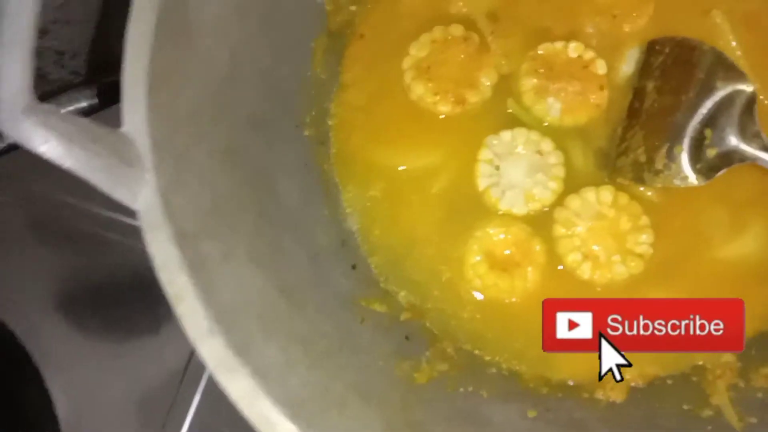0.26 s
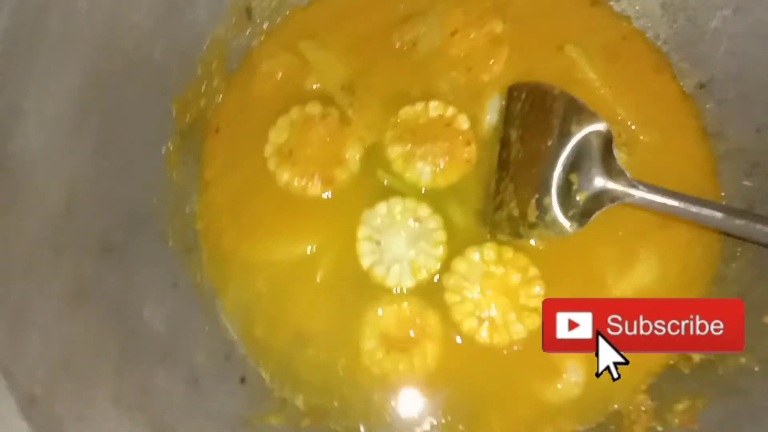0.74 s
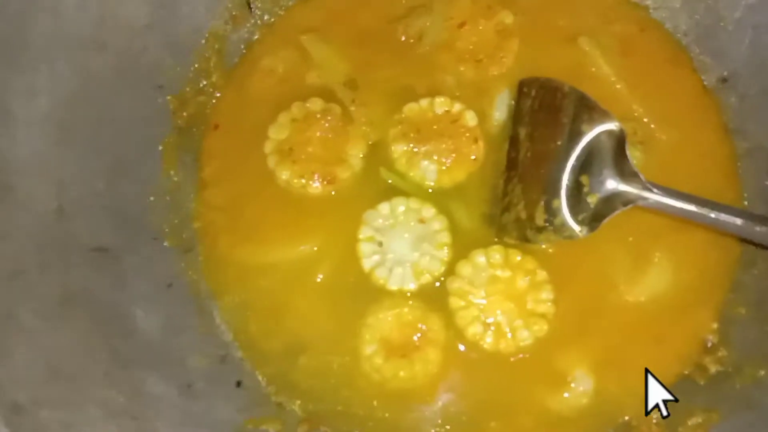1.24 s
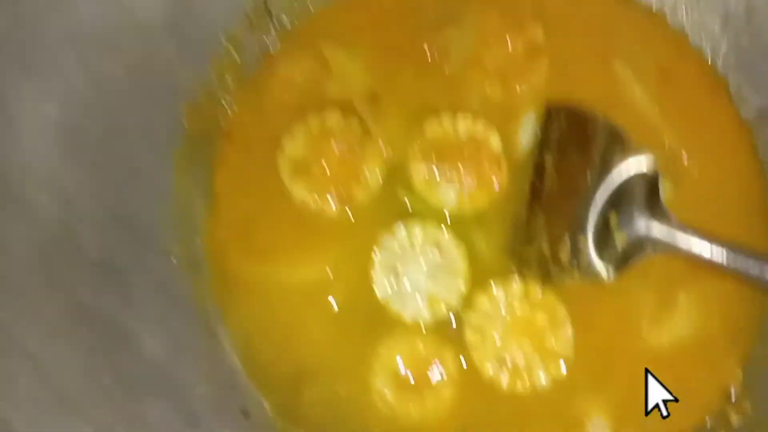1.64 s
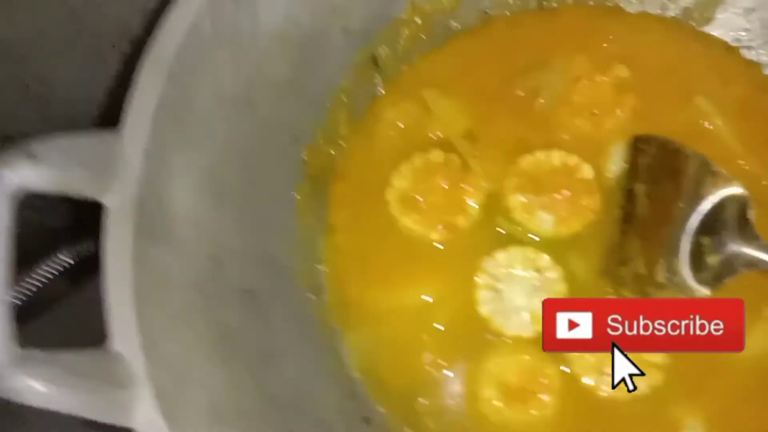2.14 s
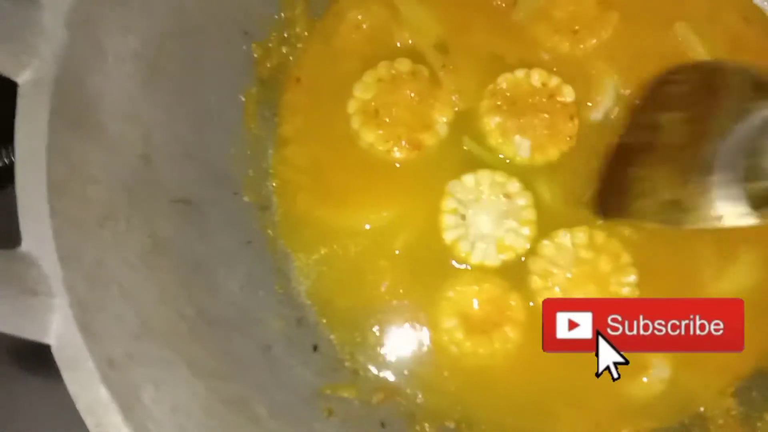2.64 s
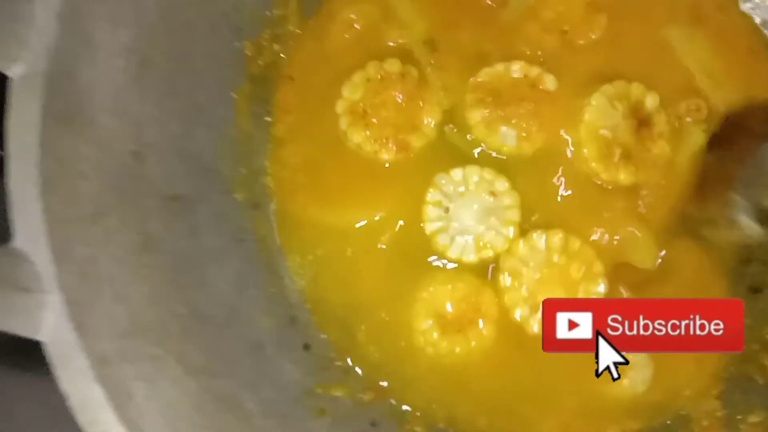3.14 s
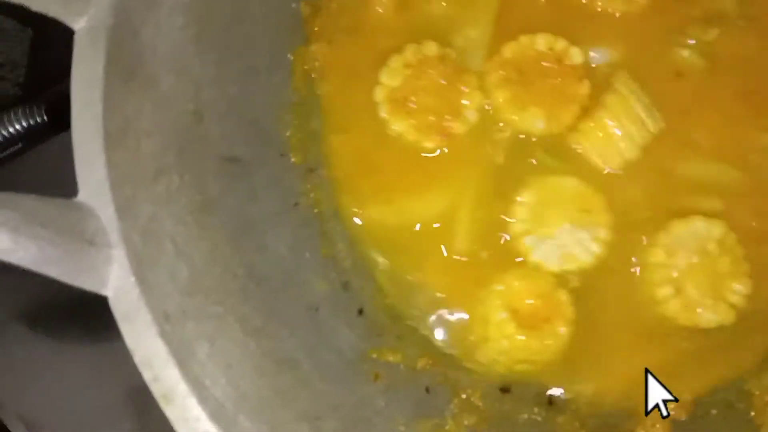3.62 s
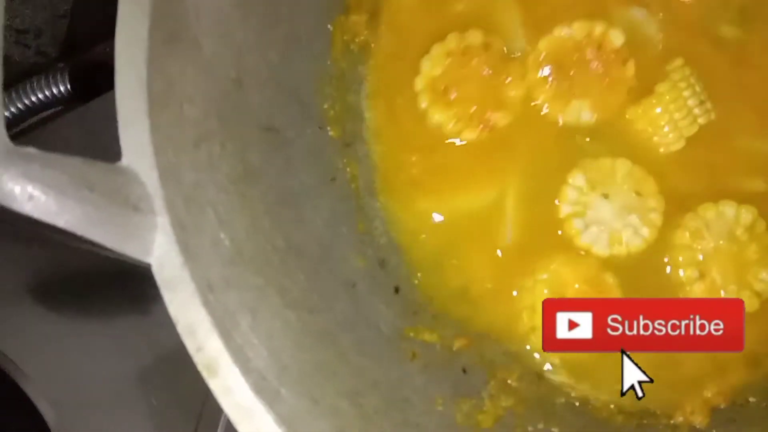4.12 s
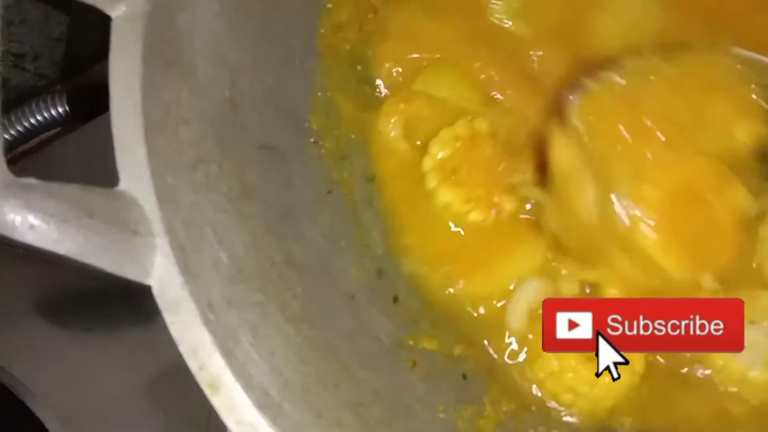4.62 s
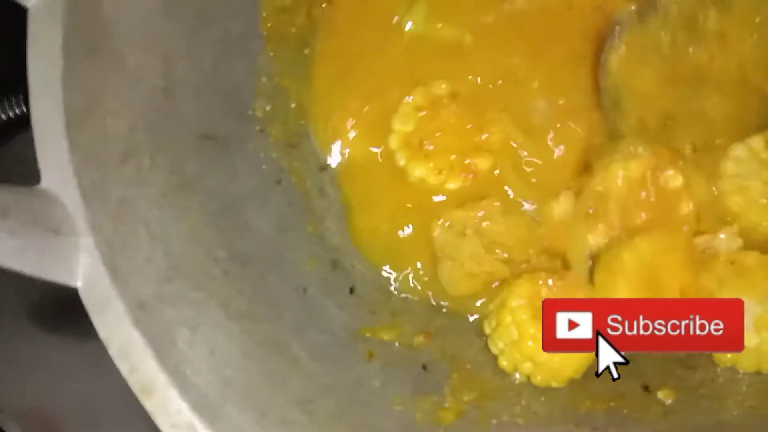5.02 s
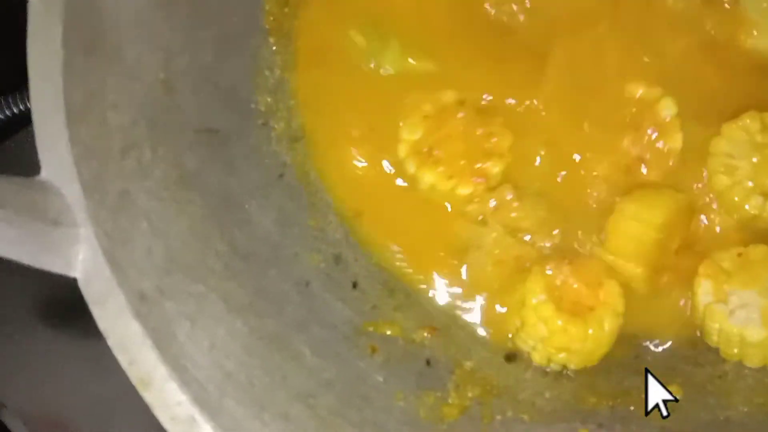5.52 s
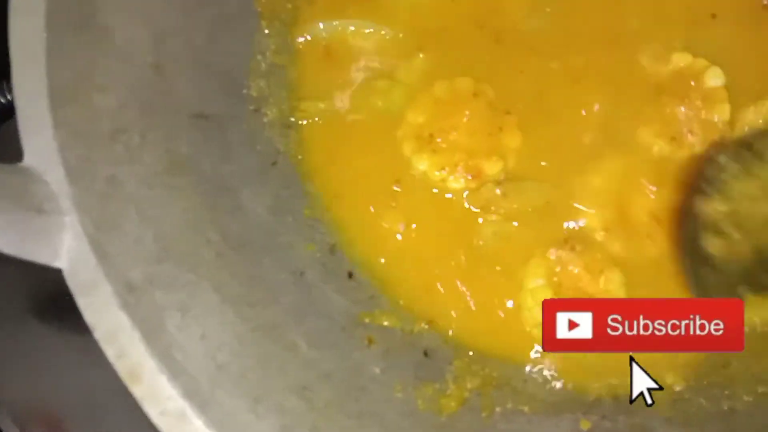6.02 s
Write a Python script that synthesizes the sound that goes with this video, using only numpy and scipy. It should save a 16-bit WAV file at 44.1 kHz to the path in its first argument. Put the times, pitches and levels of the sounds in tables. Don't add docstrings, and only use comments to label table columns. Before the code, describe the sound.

A close phone-like mono microphone hears a wok simmering: soft hiss, tiny droplet ticks, small bubbles. Liquid heaves once near the start with a short hollow knock. After a light metallic rattle midway, a spatula strikes and pushes across the damped pan, then grinds brightly with several clatters. A shorter knock and dull scrape come later, then a thin edge tick, with little room echo.

```python
import sys
import numpy as np
from scipy import signal
from scipy.fft import rfft, irfft, next_fast_len
from scipy.io import wavfile
from scipy.ndimage import uniform_filter1d, map_coordinates

SR = 44100
rng = np.random.default_rng(int(sys.argv[2]) if len(sys.argv) > 2 else 0)


def field_ratio(decibels):
    return 10 ** (np.asarray(decibels, dtype=float) / 20)


def log_audio(samples):
    frames = np.atleast_2d(samples).T
    limited = np.clip(frames, -1, 1)
    pcm = np.round(limited * 32767).astype(np.int16)
    wavfile.write(sys.argv[1], SR, pcm)


N = 276044


# time in seconds, pressure in dB, depth of the contact down the bowl in dB.
SLOSH = [(.177, -33, -15), (.215, -34.5, -6), (.228, -28, 2), (.27, -33, 7.5), (.315, -36.5, -1.5),
         (.335, -43, 8), (.362, -46, 5), (.378, -57, 5), (.5, -77, -9)]
# frequency in Hz, level in dB per Hz.
SLOP_TONE = [(35, -68), (80, -42), (200, -1.5), (370, -11.5), (980, -5), (2060, -21), (2750, -29),
             (2950, -39), (3600, -27.5), (4600, -41), (5740, -22), (8600, -49.5), (15600, -64)]
# frequency in Hz, width in Hz, level in dB over the noise.
SLOP_MODES = [(307, 160, 5), (620, 130, 4.5), (1000, 170, 10), (1280, 119, 10), (1910, 150, 15)]


def slop():
    rows = pressed(SLOSH, mix_db=(-16, -2, -18.5, -22), sinks=(0.88, 0.0061, 0.2, 0.1))
    return stroke(rows, SLOP_TONE, SLOP_MODES, (500, 1500, 2900), patchy_db=1.8, clump_db=1.6)


# time in seconds, pressure in dB, depth down the bowl in dB.
PUSHES = [
    [(3.108, -43, 15), (3.135, -43.5, 12), (3.2, -33.5, -2.5), (3.235, -34, -2.5), (3.28, -33.5, -4),
     (3.34, -37.5, -1.5), (3.365, -49, 1.5), (3.43, -55.5, -11), (3.56, -77, -20.5)],
    [(3.858, -36.5, -26), (3.9, -33.5, -15), (3.975, -41, -3.5), (4.06, -35, -4.5), (4.115, -36, 6),
     (4.16, -44.5, 3), (4.22, -49, 14), (4.29, -59.5, 8), (4.4, -85.5, -18)],
    [(5.13, -45, -7), (5.155, -46.5, -8), (5.2, -46.5, -1.5), (5.26, -55, 11), (5.33, -51.5, -3.5),
     (5.4, -56, 4), (5.46, -57.5, -9.5), (5.54, -60.5, -18), (5.62, -78.5, -10)],
    [(5.808, -43.5, -11.5), (5.83, -51, 1), (5.92, -60, -3), (6.0, -76, 4.5)],
]
# frequency in Hz, level in dB per Hz.
STROKE_TONES = [
    [(53, -66), (90, -30), (301, -18), (539, -22), (945, -3), (1240, -11), (3650, -7), (13000, -42.5)],
    [(53, -57), (90, -24.5), (1120, -6.5), (1660, -11.5), (2260, -14.5), (3500, -11), (4320, -17),
     (13000, -35)],
    [(65, -23), (110, -16), (554, -13.5), (778, -12.5), (2200, -18.5), (3480, -10), (5620, -15.5),
     (13000, -24)],
    [(53, -48), (90, -10), (636, -25.5), (4050, -39.5), (5540, -9), (13000, -34)],
]
# frequency in Hz, width in Hz, level in dB over the scrape.
STROKE_MODES = [
    [(600, 11, 5.6), (822, 16, 9), (946, 23, 9.2), (1443, 30, 6.9), (1796, 35, 6.3), (2196, 28, 6.7),
     (2478, 90, 11), (2950, 24, 8.2), (3270, 91, 14), (3590, 83, 13.3), (3840, 25, 2.3), (5939, 57, 5)],
    [(290, 20, 7), (980, 32, 4.5), (1256, 18, 11.5), (1373, 45, 16), (1651, 39, 14), (1653, 48, 8.2),
     (3435, 62, 7.2), (3556, 107.7, 7.5), (4995, 80, 2.5), (5730, 160, 4)],
    [(136.2, 57, 8.4), (413, 36, 13), (789, 18, 9.9), (1164, 51, 7), (2500, 31, 3.1), (3150, 130, 9.2),
     (3435, 78, 6.4), (3620, 150, 6.9), (5140, 140, 2.5), (5700, 100, 13)],
    [(5420, 170, 8.5), (5706, 160, 10), (7570, 250, 3)],
]
# level over the pressure in dB of thud, bowl, blade, edge.
STROKE_MIXES = [(-13, -0.1, -4.5, 0), (-18.5, 0, -1.5, 0.013), (-9.5, -7, -6.5, 0),
                (-18.5, -30, -27.5, 0.00063)]
# dB gained per dB of depth by thud, bowl, blade, edge.
STROKE_SINKS = (1, .52, 0.17, 0.073)
# frequency in Hz where thud gives way to bowl, for each stroke.
BOWL_HZ = (600, 820, 600, 600)


def spatula():
    strokes = np.zeros(N)
    for push, mix_db, low_hz, tone, modes in zip(PUSHES, STROKE_MIXES, BOWL_HZ, STROKE_TONES, STROKE_MODES):
        rows = pressed(push, mix_db, STROKE_SINKS)
        strokes += stroke(rows, tone, modes, (low_hz, 2200, 4500), patchy_db=2.0, clump_db=2.0)
    return strokes


# time in seconds, gain in dB, half length in seconds.
BITES = [
    (3.23, 15, 0.045),
    (3.995, 10.5, 0.056),
    (5.146, 10, 0.05),
]


def pressed(push, mix_db, sinks):
    s, pressure_db, depth_db = np.transpose(push)
    t = np.linspace(s[0], s[-1], 200)
    pressure = np.interp(t, s, pressure_db)[:, None]
    depth = np.interp(t, s, depth_db)[:, None]
    levels = pressure + depth * np.array(sinks) + np.array(mix_db)
    bite = sum(db * np.maximum(0, 1 - np.abs(t - at) / half) for at, db, half in BITES)
    return np.c_[t, levels + np.outer(bite, [0, 0, 1, 0])]


def stroke(rows, tone, modes, edges_hz, patchy_db, clump_db):
    start, end = rows[0][0], rows[-1][0]
    n = round((end - start) * SR)
    fade = np.minimum(1, np.arange(n) / 60) * np.minimum(1, np.arange(n)[::-1] / 900)
    drive = grit(n, patchy_db, clump_db, grains=1000, grain_db=6.0)
    out = np.zeros(N)
    out[round(start * SR):][:n] = fade * played(drive, tone, modes, edges_hz, rows, start)
    return out


def grit(n, patchy_db, clump_db, grains, grain_db):
    z = signal.stft(rng.standard_normal(n + 1024), nperseg=512)[2]
    thin = uniform_filter1d(rng.standard_normal(z.shape), size=9, axis=1)
    broad = uniform_filter1d(rng.standard_normal(z.shape), size=9, axis=0)
    broad = uniform_filter1d(broad, size=7, axis=1)
    depth_db = patchy_db * np.minimum(1, np.arange(len(z)) / 6)[:, None]
    patches = field_ratio(depth_db * (unit(broad) + unit(thin)))
    noise = signal.istft(z * patches, nperseg=512)[1][:n]
    chance, size = rng.random((n, 2)).T
    spikes = 1 + (chance < grains / SR) * field_ratio(grain_db) * size
    return noise * field_ratio(clump_db * wobble(180, n)) * spikes


def played(drive, tone, modes, edges_hz, rows, start):
    n = len(drive)
    m = next_fast_len(n + 8192)
    f = np.fft.rfftfreq(m, 1 / SR) + 1
    hz, db = np.transpose(tone)
    colour = field_ratio(np.interp(np.log(f), np.log(hz), db))
    lift = 1 + sum(field_ratio(g) * 1j * f * w / (c * c - f * f + 1j * f * w) for c, w, g in modes)
    z = rfft(drive, m) * colour * lift
    below = [0 * f] + [1 / (1 + (f / e) ** 20) for e in edges_hz] + [1 + 0 * f]
    s, *levels = np.transpose(rows)
    t = start + np.arange(n) / SR
    out = np.zeros(n)
    for a, b, level in zip(below, below[1:], levels):
        register = irfft(z * np.sqrt(np.abs(b - a)), m)[:n]
        out += field_ratio(np.interp(t, s, level)) * unit(register)
    return out


def unit(x):
    return x / np.sqrt(np.mean(x ** 2) + 1e-20)


def wobble(rate, n):
    knots = rng.standard_normal(int(n * rate / SR) + 4)
    return map_coordinates(knots, [np.arange(n) * rate / SR])


def contacts(table, spread, side, rise_s, late_s, crack_db):
    out, t = np.zeros(N + SR), np.arange(SR // 6) / SR
    for s, db, hz, t60 in table:
        a, b = rng.uniform(0.17, 1.7, 2)
        tone = lambda ratio: np.sin(2 * np.pi * hz * ratio * t)
        ring = tone(0.99) + side * (tone(1 + spread * a) + tone(1 - spread * b))
        blow = 0.84 + 0.46 * np.exp(-4 * t * hz / 10)
        envelope = field_ratio(-60 * t / t60) * blow * (1 - np.exp(-t / rise_s))
        hiss = np.diff(np.diff(rng.standard_normal(len(t) + 2))) / 2
        crack = field_ratio(crack_db - 60 * t / 0.017) * hiss
        out[round((s + late_s) * SR):][:len(t)] += field_ratio(db) * (ring * envelope + crack)
    return out[:N]


# time in seconds, peak in dB.
DRY = [(3.1088, -10), (3.1974, -15), (3.2316, -5.5), (3.2365, -9.5), (3.2395, -9), (3.228, -13),
       (3.2558, -10.5), (3.2664, -13), (4.0776, -12), (4.2018, -28)]
# time in seconds, peak in dB.
WET = [(1.7414, -45.5), (2.59, -41), (3.8776, -19.5), (4.0383, -23), (4.0971, -15), (4.147, -12),
       (5.3208, -37.5)]
# time in seconds, peak in dB.
EDGE = [(1.1189, -39.5), (5.0843, -45), (5.1135, -31), (5.1383, -8), (5.1517, -28.5), (5.1871, -29),
        (5.8077, -9.5), (5.8195, -31), (5.8294, -32), (5.8374, -29), (5.8463, -34)]
# time in seconds, peak in dB, frequency in Hz.
RIM = [(3.109, -19.5, 5100), (3.1872, -20.5, 2500), (3.463, -41, 5900), (3.8592, -11.5, 4820),
       (3.86, -19, 5700), (3.861, -26, 2550), (4.472, -50.5, 3080), (5.1329, -29, 2400), (5.808, -36, 4760),
       (6.0162, -61.5, 3700)]


def clinks():
    rows = [(*row, 3600, 0.013) for row in DRY]  # Hz, t60 in seconds
    rows += [(*row, 3400, 0.014) for row in WET]
    rows += [(*row, 5480, 0.01) for row in EDGE]
    rows += [(*row, 0.021) for row in RIM]
    steel = contacts(rows, spread=0.06, side=0.43, rise_s=0.00079, late_s=0.00044, crack_db=-33)
    late = np.arange(N) / SR > 5.7
    return np.where(late, thinned(thinned(steel)), steel)


# start in seconds, peak in dB, frequency in Hz, t60 in seconds.
SLIDES = [(3.222, -27, 943, 0.12), (3.285, -29, 930, 0.2003), (3.29, -34, 1800, 0.19),
          (3.992, -22, 1722, 0.12), (4.012, -22, 1700, 0.093), (4.05, -24, 1650, .1),
          (4.068, -22, 1640, .1), (5.52, -58, 2500, 0.095), (5.29, -52, 1600, .12), (5.38, -46, 3600, 0.14),
          (5.41, -45, 3500, 0.096), (5.49, -56, 2620, 0.13), (5.735, -55, 6700, 0.21),
          (4.975, -64.5, 1250, 0.25), (5.08, -56.5, 1500, 0.22), (5.245, -49, 1190, .15),
          (5.38, -52, 140, 0.34), (5.44, -53.5, 150, 0.27), (5.235, -55, 380, .25), (5.345, -52, 397, .12),
          (5.23, -52.5, 800, .2), (5.37, -56, 1100, .2), (3.875, -37, 1100, .2), (3.88, -38, 900, 0.15),
          (3.865, -36, 2500, .1), (4.25, -48, 1450, 0.21)]


def slides():
    rings = contacts(SLIDES, spread=0.025, side=0.99, rise_s=0.023, late_s=0, crack_db=-49.5)
    return rings * field_ratio(2.1 * wobble(150, N))


# time in seconds, peak in dB, frequency in Hz.
CHOKED = [(.318, -42, 614), (3.1085, -11, 1220), (4.0963, -9.5, 1640), (4.109, -17, 1611),
          (5.139, -22.5, 1790), (4.0398, -10, 1600), (4.0696, -15, 1600), (4.058, -20, 1680),
          (4.113, -18, 1450), (4.126, -22, 1650), (5.139, -28.5, 1290), (5.139, -20, 3700),
          (.213, -27, 1100), (.234, -25, 1140)]


def choked_knocks():
    rows = [(*row, 0.014) for row in CHOKED]
    blows = contacts(rows, spread=0.11, side=0.3, rise_s=0.0007, late_s=0.0003, crack_db=-38)
    return signal.sosfilt(signal.butter(2, 294, 'high', fs=SR, output='sos'), blows)


# time in seconds, peak in dB, frequency in Hz.
KNOCKS = [(.1772, -18, 1240), (.188, -23, 1250), (.222, -19.5, 820), (.226, -16.5, 1037),
          (.242, -24.5, 970), (.264, -29, 1106), (3.229, -16.5, 963), (4.019, -15.5, 1703),
          (4.0415, -12, 1650), (4.076, -13, 1634), (4.145, -17, 1476), (4.209, -25, 1580),
          (5.116, -45, 1400)]
# time in seconds, peak in dB, frequency in Hz, t60 in seconds.
THUDS = [(0.286, -57, 90, 0.26), (5.135, -56.5, 75, 0.11), (.385, -49, 1000, 0.24),
         (1.14, -54.5, 690, 0.041), (1.16, -63.5, 307, 0.21), (3.109, -29.5, 600, 0.011),
         (3.899, -51, 290, 0.23), (4.096, -20, 858, 0.034), (4.106, -28.5, 355, 0.032),
         (4.147, -33.5, 476, 0.051), (5.139, -37.5, 1110, 0.037), (5.2, -45.5, 434, 0.046),
         (5.348, -48.5, 410, 0.08), (5.362, -51, 142, 0.29), (5.41, -51, 131, 0.35)]
# time in seconds, peak in dB, frequency in Hz.
POPS = [(1.124, -51, 2150), (1.159, -55, 813), (1.295, -51.5, 1710), (1.876, -62, 494), (1.974, -58, 767),
        (2.15, -57.5, 700), (2.244, -57.5, 789), (2.316, -57.5, 837), (2.403, -47.5, 685),
        (2.948, -35.5, 820), (3.085, -43.5, 1420), (3.516, -54, 2170), (4.949, -61, 1670),
        (5.203, -36, 791)]
# time in seconds, peak in dB, frequency in Hz.
GURGLES = [(.294, -31.5, 980), (.569, -51, 820), (.873, -57, 1520), (.899, -54.5, 1420),
           (1.309, -56.5, 1280), (1.756, -64, 610), (2.461, -57.5, 620), (2.559, -57.5, 613),
           (2.822, -54.5, 980), (3.303, -25.5, 939), (3.861, -38.5, 1387), (4.472, -48, 1243),
           (5.069, -59.5, 1562), (6.18, -63.5, 1679), (6.19, -64, 790)]


def knocks_and_pops():
    kinds = [(POPS, 0.036), (GURGLES, 0.07), (KNOCKS, 0.021)]
    rows = [(*row, t60) for table, t60 in kinds for row in table]
    return contacts(rows + THUDS, spread=0.15, side=0.33, rise_s=0.00088, late_s=0.00033, crack_db=-40)


# onset in seconds, level in dB.
TOUCH = [
    (2.588, -48),
    (2.597, -38),
    (2.618, -42.5),
    (2.64, -47),
]
# frequency in Hz, level in dB, t60 in seconds.
HANDLE = [(938, -6, 0.08), (1150, -12, 1.03), (1416, -5.5, 0.33), (1580, 1, 0.13), (1780, -14, .11),
          (2050, -11, .05), (2513, -9.5, 0.13), (3330, 3.5, 0.043)]


def handle():
    out, t = np.zeros(N + SR), np.arange(SR // 2) / SR
    for s, db in TOUCH:
        ring = np.zeros(len(t))
        for hz, g, t60 in HANDLE:
            level_db = g + rng.normal(0, 1.2) - 60 * t / t60 + 4.1 * wobble(55, len(t))
            ring += field_ratio(level_db) * np.sin(2 * np.pi * hz * (t + s))
        buzz = np.convolve(rng.standard_normal(len(t)), np.hanning(7), 'same')
        ring += field_ratio(-12.5 - 60 * t / 0.088) * buzz
        out[round(s * SR):][:len(t)] += field_ratio(db - 8) * ring * (1 - np.exp(-t / 0.003))
    since_grip = np.maximum(0, np.arange(N) / SR - 2.94)
    return out[:N] * field_ratio(-60 * since_grip / 0.068)


# time in seconds, peak in dB.
SPITS = [(2.7145, -38.5), (3.3097, -29), (3.493, -40), (3.5143, -35), (3.562, -42), (3.6805, -45),
         (3.8594, -19), (3.9882, -34), (4.0391, -14.5), (4.0736, -24), (4.1469, -24), (4.2359, -33.5),
         (4.4756, -45.5), (4.7981, -44.5), (4.8498, -45), (4.904, -43.5), (4.277, -41), (4.933, -47),
         (4.9507, -34.5), (5.0787, -39), (5.1147, -28.5), (5.1881, -31.5), (5.7888, -44.5), (6.248, -46),
         (5.8412, -43), (5.879, -39)]
# time in seconds, peak in dB, frequency in Hz.
SNAPS = [(3.9, -36, 11500), (3.86, -27, 7300), (4.041, -21.5, 14930), (5.1401, -17.5, 10470),
         (5.893, -44.5, 9020)]


def spits():
    fat = [(*row, 6900 * (1 + 0.071 * rng.normal())) for row in SPITS]
    rows = [(*row, 0.004) for row in fat + SNAPS]
    return thinned(contacts(rows, spread=0.17, side=0.3, rise_s=0.0001, late_s=0.00047, crack_db=-15.5))


def thinned(x):
    return signal.sosfilt(signal.butter(2, 4410, 'high', fs=SR, output='sos'), x)


# time in seconds, peak in dB.
SIZZLE_TICKS = [(0.3382, -44), (0.3866, -48), (0.4245, -46), (0.5188, -47), (0.7229, -41), (0.8451, -48),
                (1.0212, -45), (1.123, -47), (1.1968, -50), (1.2517, -43), (1.3145, -46), (1.3943, -49),
                (1.4687, -45), (1.5994, -45), (1.7515, -48.5), (1.969, -49), (2.1037, -47), (2.2499, -50),
                (2.4814, -46.5), (2.5682, -49), (2.7118, -51.5),
                (4.637, -52), (4.78, -54), (5.45, -50), (5.465, -52), (5.545, -54), (5.895, -48),
              (3.765, -52), (5.399, -46)]


def droplets():
    rows = [(s, db - 0.6, 8800 * (1 + 0.25 * rng.uniform(-1, 1)), 0.003)
            for s, db in SIZZLE_TICKS]
    ticks = contacts(rows, spread=0.34, side=0.6, rise_s=0.0001, late_s=0.0004, crack_db=-14)
    return thinned(thinned(ticks))


def bubbles(count):
    when, size, pitch = rng.random((count, 3)).T
    peak_db = -66 - 4 * np.log(size + 0.05)
    pops = np.c_[when * N / SR, peak_db, 450 * 4 ** pitch, np.full(count, 0.012)]
    return contacts(pops, spread=0.49, side=0.37, rise_s=0.00092, late_s=0, crack_db=-29.5)


# frequency in Hz, level in dB per Hz.
AIR = [(18, -48.5), (30, -16.5), (148, -5.5), (250, -10.5), (790, -10.5), (1720, -14.5), (1950, -18),
       (2500, -21), (3500, -9.5), (4500, -17), (5700, -5), (7500, -7), (9500, -13), (13500, -14),
       (15400, -13)]
# frequency in Hz, width in Hz, level in dB.
PAN = [(152, 15, 6), (1670, 41, 1.9), (3360, 80, 13), (3666, 120, 15), (5550, 100, 1.3), (5833, 170, 9.1),
       (6680, 320, 1.7), (7530, 280, 3.9)]
# time in seconds, boil in dB.
BOIL = [(0, -5), (.1, 2.5), (0.449, 3), (1.15, -2.5), (1.5, 0.5), (2.25, -1), (2.7, -3), (3.02, 4),
        (3.62, -3), (3.8, -5.5), (4.42, -19), (4.65, -37), (4.949, -15.5), (5.68, -31), (6.05, -27),
        (6.12, -12.5), (6.26, -10)]
# level in dB at a full boil of hum, simmer, sizzle, fizz, finest spray.
STOVE_DB = (-73.5, -74.5, -68.5, -62.5, -68.5)
STOVE_FOLLOWS = (0.06, .22, 1, .22, 0.4)


def simmer():
    breath = field_ratio(0.62 * wobble(11.0, N))
    drive = grit(N, patchy_db=2.5, clump_db=1.14, grains=40, grain_db=17) * breath
    rows = [(s, *(np.array(STOVE_DB) + boil_db * np.array(STOVE_FOLLOWS))) for s, boil_db in BOIL]
    return played(drive, AIR, PAN, (300, 2800, 5000, 11800), rows, 0)


def starved(x):
    f = np.fft.rfftfreq(N, 1 / SR)
    band = irfft(rfft(x) * ((f > 11900) & (f < 14300)), N)
    sag_db = 5 * np.clip(1.6 * wobble(14, N) - 0.3, 0, 1.5)
    return x - band * (1 - field_ratio(-sag_db))


def kitchen(x, t60):
    t = np.arange(SR // 4) / SR
    tail = rng.standard_normal(len(t)) * field_ratio(-60 * t / t60) * (t > 0.004)
    return signal.fftconvolve(x, tail / np.linalg.norm(tail))[:N]


def scene():
    dull = knocks_and_pops() + handle() + bubbles(count=60)
    sharp = clinks() + spits() + slides() + choked_knocks()
    room = field_ratio(-5.5) * kitchen(dull, t60=0.27) + field_ratio(-11) * kitchen(sharp, t60=0.2)
    mono = slop() + spatula() + dull + sharp + room + droplets() + starved(simmer())
    return np.array([mono, mono])


def top_cut(x):
    return signal.sosfilt(signal.butter(12, 16640, fs=SR, output="sos"), x)


def record(dry):
    f = np.fft.rfftfreq(N, 1 / SR) + 1
    peak = 1 + field_ratio(-1) * np.exp(-((f - 15000) / 1300) ** 2)
    bass_cut = 1 / (1 + (40 / f) ** 2)
    notch = 1 - 0.36 * np.exp(-((f - 10900) / 350) ** 2)
    limit = np.where(f < 15520, 1, field_ratio(-29.0))
    finished = irfft(rfft(dry) * peak * bass_cut * notch * limit, N)
    return top_cut(finished)


dry = scene()
out = record(dry)
log_audio(out)
```